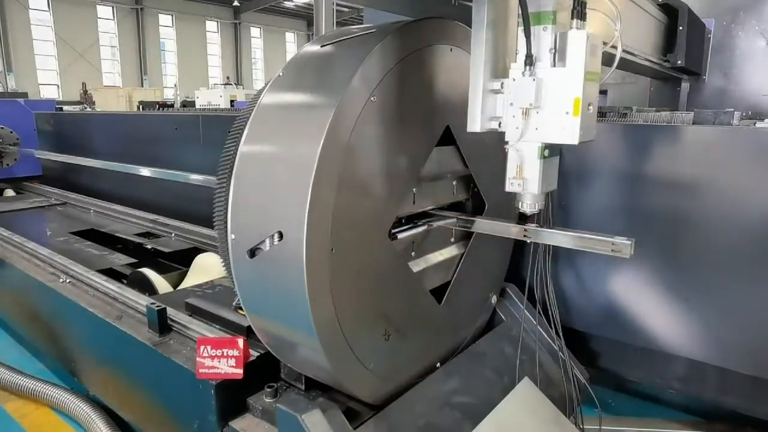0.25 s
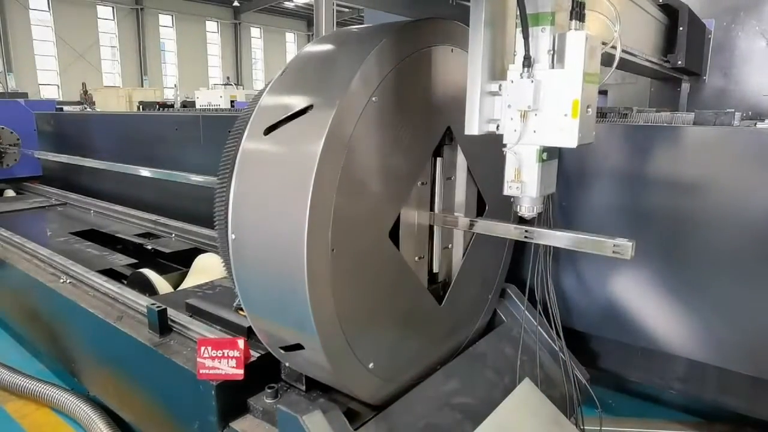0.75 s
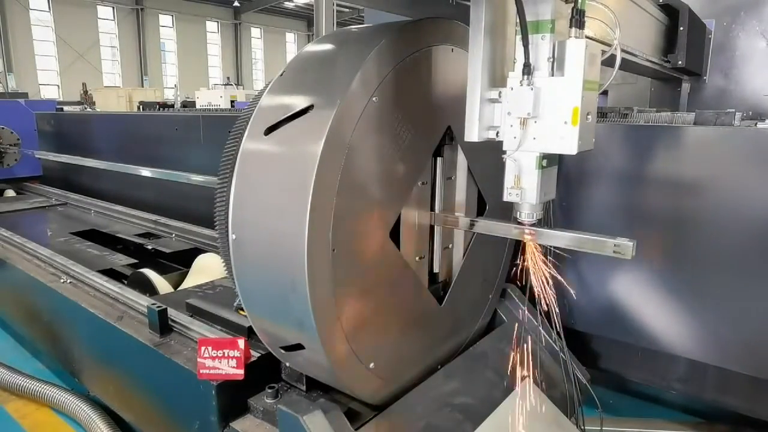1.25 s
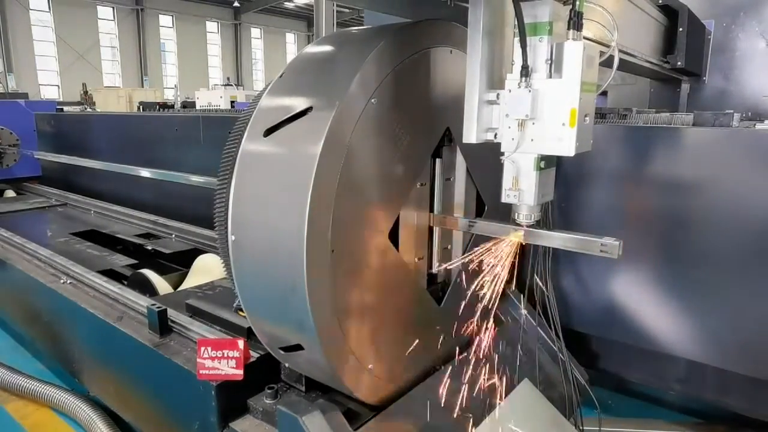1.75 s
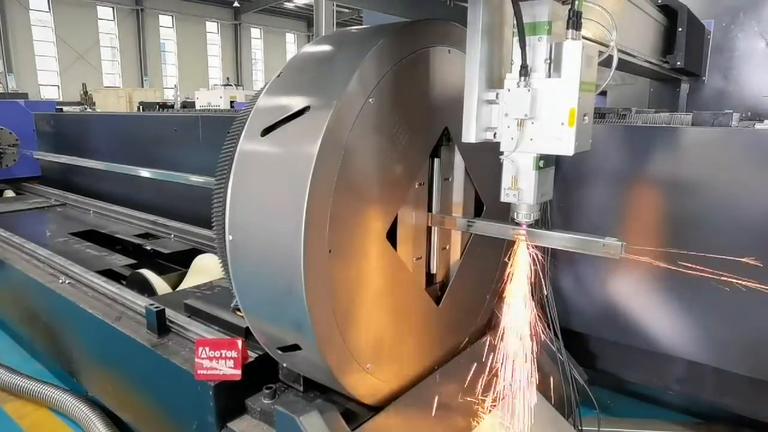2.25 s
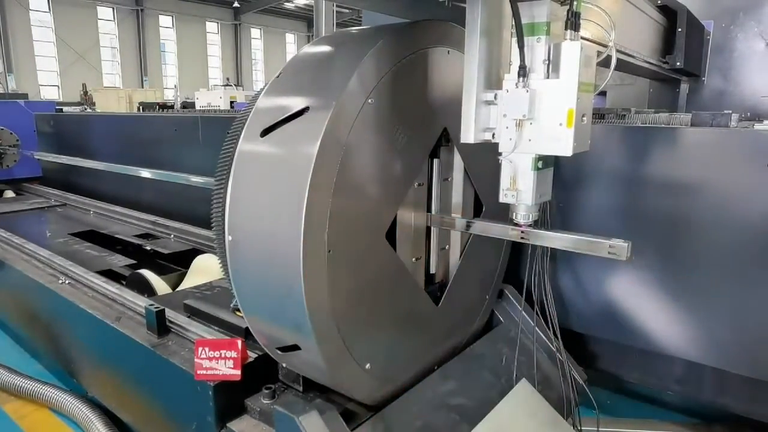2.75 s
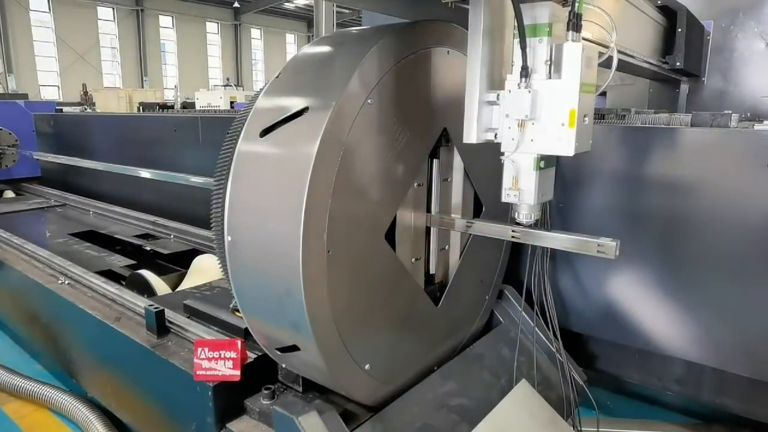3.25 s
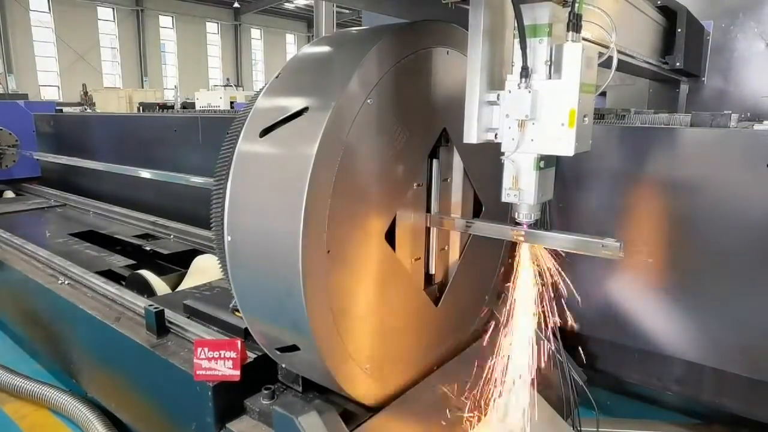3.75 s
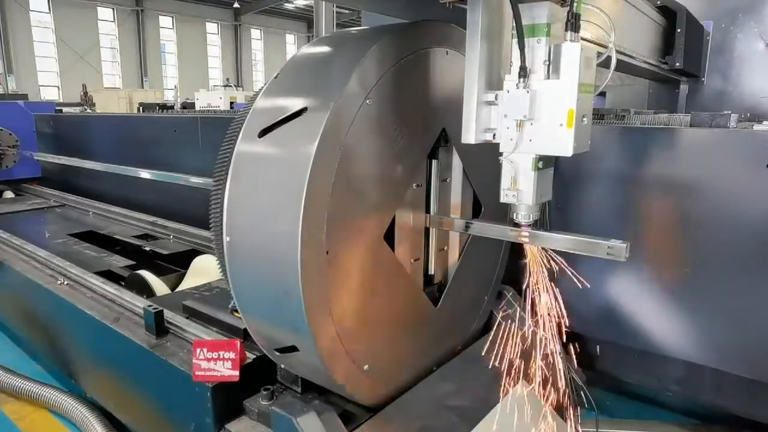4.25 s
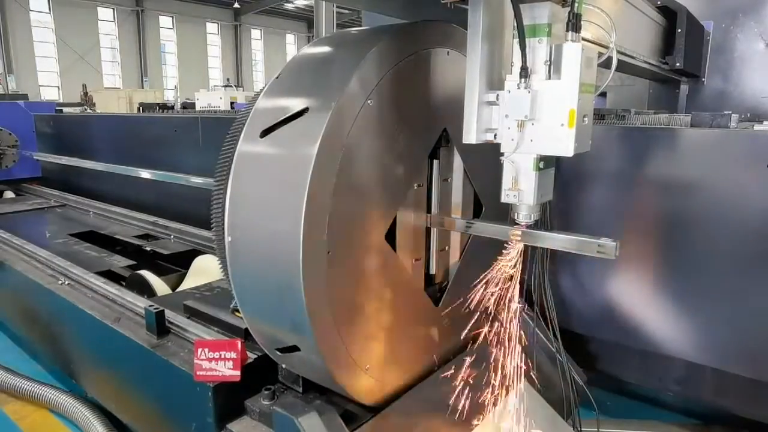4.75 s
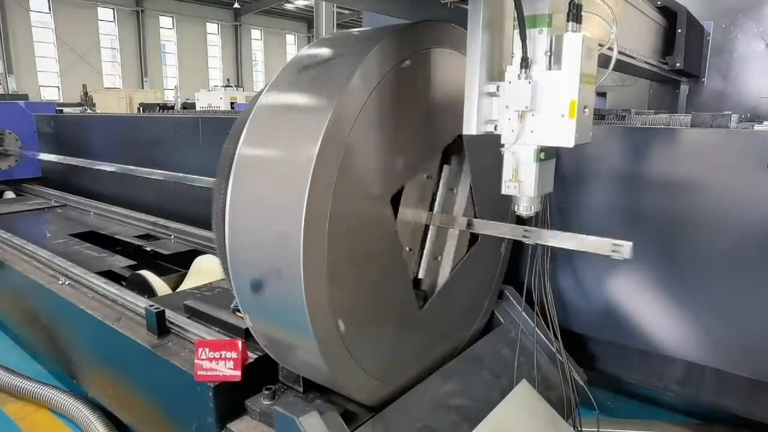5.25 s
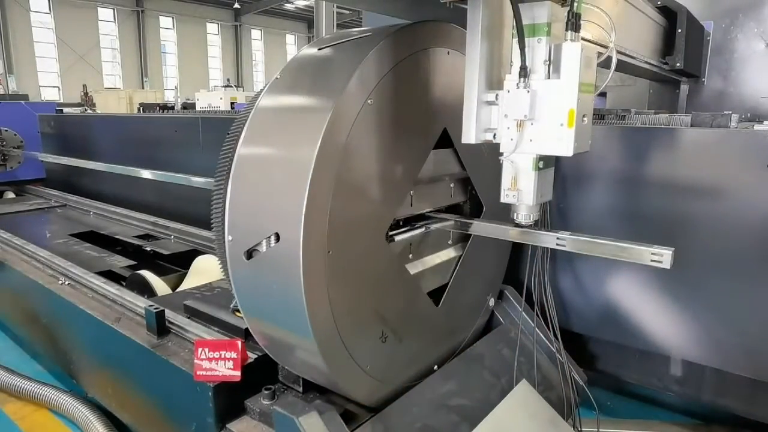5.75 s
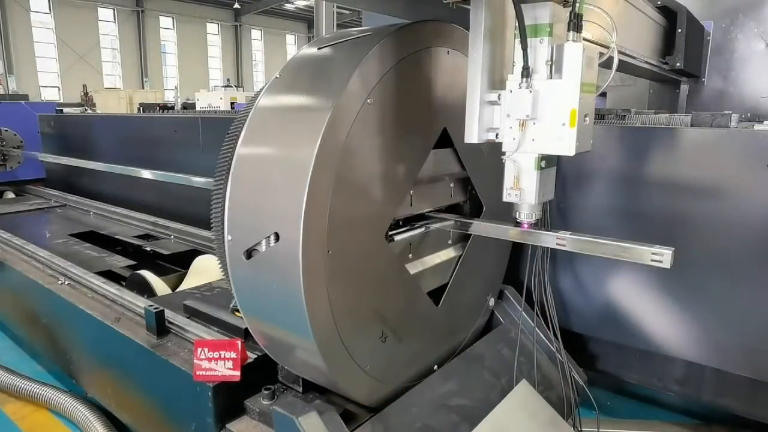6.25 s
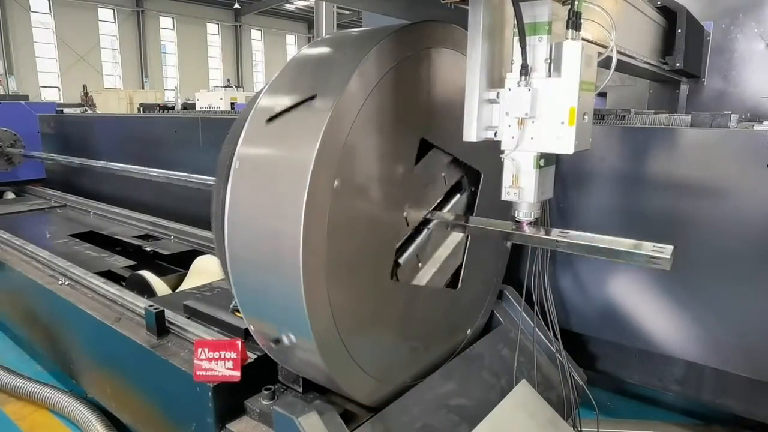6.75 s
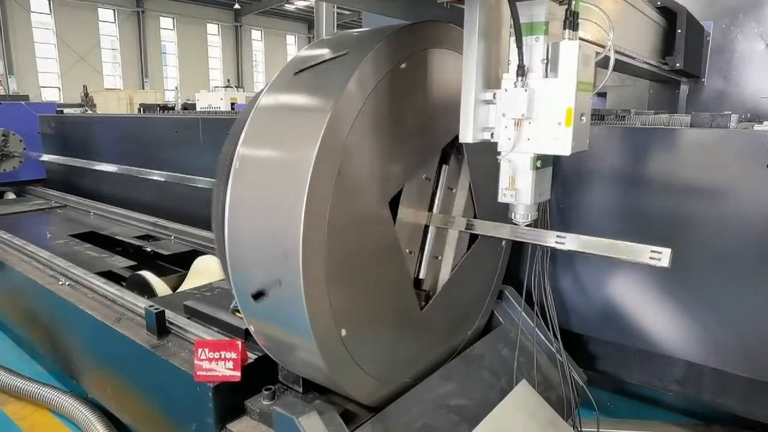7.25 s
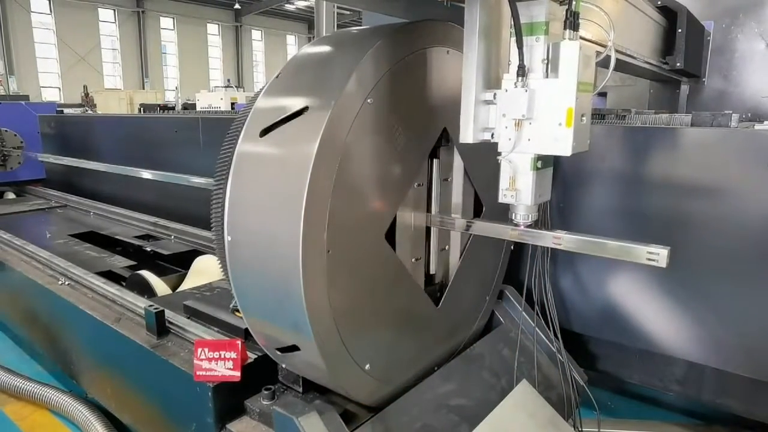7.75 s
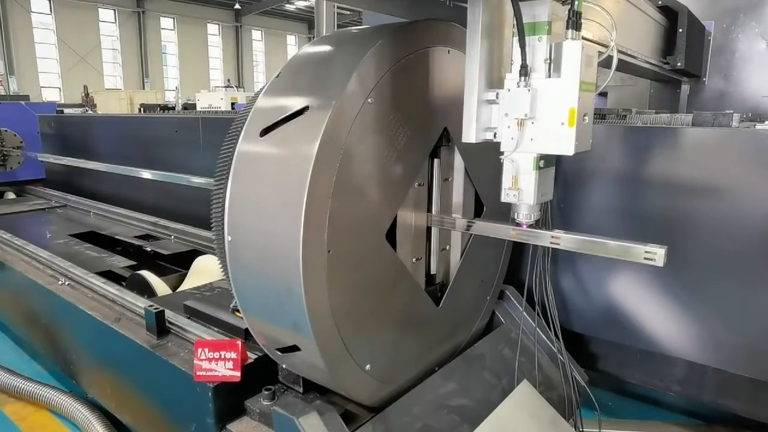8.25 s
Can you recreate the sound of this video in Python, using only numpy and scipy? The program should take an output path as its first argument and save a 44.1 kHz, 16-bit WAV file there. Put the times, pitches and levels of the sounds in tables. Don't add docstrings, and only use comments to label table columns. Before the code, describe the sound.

A harsh, continuous gas-jet hiss swells and dips as a laser cuts metal tube, with faint drive hums and dull valve thumps in a workshop.

```python
import sys
import numpy as np
from scipy import signal
from scipy.fft import rfft, irfft, next_fast_len
from scipy.io import wavfile
from scipy.ndimage import uniform_filter1d, map_coordinates

SR = 44100
rng = np.random.default_rng(int(sys.argv[2]) if len(sys.argv) > 2 else 0)


def nominal_scale(level):
    x = np.asarray(level, float) / 20
    return 10 ** x


def to_wav(sig):
    pcm = np.clip(np.atleast_2d(sig), -1, 1) * 32767
    pcm = np.round(pcm).astype(np.int16)
    wavfile.write(sys.argv[1], SR, pcm.T)


N = 374409
T_S = np.arange(N) / SR

# t/s, rise/s, hold/s, fall/s, level/dB
BLASTS = [
    (.12, 0.013, 0.46, 0.075, 7),
    (2.722, 0.018, 0.13, 0.27, 6.5),
    (4.997, 0.0037, 0.19, 0.052, 4.5),
    (7.446, .008, .26, .012, 0),
]
# t/s, rise/s, hold/s, fall/s, level/dB
CLEAR = [
    (5.79, 0.037, 0.42, .012, -4.5),
    (6.5, 0.084, 0.074, 0.14, -0.5),
    (7.0, 0.21, 0.23, .01, -2.5),
]
# t/s, length/s, f/Hz, level/dB, sag/(dB/s)
FIRST_TURNS = [
    (.365, 0.23, 132.7, -46, -14),
    (0.62, 0.18, 133.8, -49.5, -1),
    (0.79, 0.22, 132, -57.5, -7),
]
TURNS = [
    (5.245, 0.412, 133, -46, 0),
    (5.62, 0.17, 132.4, -52, -30),
    (5.886, 0.31, 134, -59, -3),
]
SLOW_TURNS = [
    (6.69, 0.47, 113.5, -59, 3),
    (7.26, 0.18, 113.2, -54, 2),
]


def unit(x):
    return x / np.sqrt(np.mean(x ** 2) + 1e-20)


def along(points, hz):
    f, v = np.transpose(points)
    return np.interp(np.log(hz + 1), np.log(f + 1), v)


def curve(rows):
    s, v = np.transpose(rows)
    return np.interp(T_S, s, v)


def surges(rows):
    total_db = 0
    for s, rise, hold, fall, db in rows:
        shape = np.minimum((T_S - s) / rise, 1 + (s + rise + hold - T_S) / fall)
        total_db = total_db + db * np.clip(shape, 0, 1)
    return total_db


def bumps(rows):
    return sum(db * np.exp(-.5 * ((T_S - s) / half) ** 2) for s, db, half in rows)


def wobble(rate):
    knots = rng.standard_normal(int(N * rate / SR) + 4)
    return map_coordinates(knots, [np.arange(N) * rate / SR])


def filtered(x, response):
    m = next_fast_len(N + 8192)
    return irfft(rfft(x, m) * response(np.fft.rfftfreq(m, 1 / SR)), m)[..., :N]


def turbulence(patchy_db):
    z = signal.stft(rng.standard_normal((2, N)), nperseg=256)[2]
    field = uniform_filter1d(rng.standard_normal(z.shape[1:]), size=4, axis=0)
    field = uniform_filter1d(field, size=14, axis=1)
    return signal.istft(z * nominal_scale(patchy_db * field / field.std()), nperseg=256)[1][:, :N]


def ports(pair, alike, paths):
    def mix(hz):
        echo = sum(weight * np.exp(-2j * np.pi * hz * lag) for lag, weight in paths)
        common = along(alike, hz) * echo
        common = common / np.maximum(np.abs(common), 1)
        return np.array([common, np.sqrt(np.abs(1 - np.abs(common) ** 2))])
    return np.array([pair[0], filtered(pair, mix).sum(0)])


def lulls():
    valve_gaps = [
        (0.783, 0.926, -19.5, 0.45),
        (3.075, 3.183, -5.5, 0.5),
        (5.669, 5.799, -15, 0.64),
        (6.095, 6.305, -7.5, 0.41),
    ]
    refill_s, total_db = 0.069, 0
    for shut, back, db, left in valve_gaps:
        bleed = np.clip((T_S - shut) / (back - shut), 0, 1)
        refill = left * np.exp(-np.abs(T_S - back) / refill_s)
        total_db = total_db + db * np.where(T_S < back, bleed, refill)
    return total_db


def pressure():
    # t/s, level/dB
    nozzle_flow = [(0, -21), (.8, -27.5), (1.12, -25.5), (1.32, -27), (1.87, -24.5), (2.3, -24.5),
                   (2.72, -23.5), (3.3, -20.5), (3.76, -19), (4.04, -21), (4.58, -19.5), (4.84, -21),
                   (5.5, -22), (6.6, -23), (6.88, -22), (7.25, -19.5), (7.55, -22), (8.49, -22.5)]
    # t/s, change/dB, half width/s
    head_drifts = [(1.117, 2, .006), (7.74, -1.5, .015), (3.45, -1, .08), (3.75, -1.5, 0.061),
                   (4.7, -0.5, .12), (6.85, -1, .1), (5.6, -0.5, .06), (.675, 1.5, 0.071),
                   (2.74, 1.5, 0.0095), (2.85, 0.5, .025), (2.95, 1.5, 0.013), (3.59, -5, 0.079),
                   (5.2, 3, 0.052), (5.3, 3, 0.046), (5.99, 2, .02), (.56, 3.5, 0.011), (5.55, 1.5, 0.048),
                   (6.5, 2.5, .03), (7.63, 1.5, 0.024)]
    return curve(nozzle_flow) + surges(BLASTS) + bumps(head_drifts) + lulls()


def into_tube():
    # t/s, level/dB
    tube_drive = [(0, -2), (.42, 1), (.62, -3), (.95, -1), (1.3, 3), (1.87, 2), (2.2, -2.5), (2.55, -2),
                  (2.85, 1), (3.07, -0.5), (3.4, -3.5), (3.6, 5), (3.78, -1), (4.04, 1.5), (4.84, -5),
                  (5.18, 1.5), (5.6, -6), (8.49, -3.5)]
    return curve(tube_drive) + surges(CLEAR)


def fed_out():
    return np.clip((T_S - 5.38) / 0.12, 0, 1)


def colour(hz):
    # f/Hz, left/(dB per Hz), right/(dB per Hz)
    port_levels = [(1500, -29.5, -27.0), (1900, -29.5, -27.0), (2150, -23.5, -19.5), (2400, -17.5, -11.0),
                   (2600, -18.5, -18.0), (3000, -20.5, -20.0), (3300, -17.5, -15.5), (3550, -19.5, -15.5),
                   (3800, -17.0, -16.0), (3930, -18, -18), (4050, -15.5, -16.5), (4200, -12, -17),
                   (4330, -15.5, -19.5), (4450, -15.5, -21.5), (4600, -14.0, -18.0), (4780, -15.5, -14.0),
                   (4950, -11.0, -14.5), (5120, -18.5, -12), (5400, -13.5, -11.0), (5700, -13.5, -8.0),
                   (6050, -14.0, -10.0), (6300, -10.0, -10.0), (6500, -10.5, -10.0), (6700, -12.5, -16.5),
                   (6900, -11.0, -13.0), (7150, -11.5, -10.0), (7550, -8.5, -9.0), (7800, -8.0, -12.0),
                   (8100, -2.5, -10.5), (8350, -0.5, -11.5), (8650, -3.0, -9.5), (9000, -6.0, -12.5),
                   (9350, -11.0, -14.5), (9800, -8.0, -15.0), (10200, -7.5, -18.0), (10500, -11.0, -22.0),
                   (10900, -12.0, -19.0), (11300, -16.0, -24.0), (11700, -18.0, -24.5),
                   (12500, -19.5, -22.5), (13500, -20.0, -26.0), (14400, -18.5, -28.5),
                   (15100, -16.5, -27.0), (15700, -16.5, -27.0)]
    # lag/s, left/dB, right/dB
    echo_faces = [
        (.0021, -24, -22),
        (.0034, -22, -20),
        (.0057, -23, -20),
        (.0093, -18, -18),
    ]
    echoes = 1
    for lag, left_db, right_db in echo_faces:
        delay_s = lag * np.array([[1], [1.13]])
        echoes = echoes + nominal_scale([[left_db], [right_db]]) * np.exp(-2j * np.pi * hz * delay_s)
    at_hz, *sides_db = np.transpose(port_levels)
    spectrum = nominal_scale([np.interp(hz, at_hz, side_db) for side_db in sides_db])
    return spectrum * echoes * np.minimum(hz / 1500, 1) ** 4


def ringing(rings):
    def response(hz):
        return nominal_scale(sum(np.array([[left_db], [right_db]]) * np.exp(-.5 * ((hz - at_hz) / w) ** 2)
                       for at_hz, w, left_db, right_db in rings))
    return response


def jet_gas():
    # f/Hz, strength
    common_strength = [(1500, 2.6), (2400, 1.42), (3500, 1), (6000, 1.74), (10000, 1.27), (15000, 1)]
    # right port lag/s, signed weight
    port_paths = [(-7e-05, -0.049), (-5e-06, -0.066), (7.5e-05, -0.118), (0.000155, 0.05),
                  (0.00031, -0.073), (0.00057, 0.103), (0.000785, -0.081), (0.0009, -0.052),
                  (0.00127, -0.038), (0.001425, 0.04), (0.0015, 0.044), (0.001545, 0.063),
                  (0.00171, -0.049), (0.002135, -0.068), (0.00218, -0.056), (0.00241, 0.047),
                  (0.00248, -0.065), (0.00256, 0.039)]
    # f/Hz, width/Hz, left/dB, right/dB
    blast_rings = [(3650, 250, 0, 3), (4950, 180, 4, 2), (5600, 250, -4, -1), (6300, 200, 2, 1),
                   (7550, 200, 3, 1), (8900, 250, -3, 1), (15200, 500, 1, 3)]
    # f/Hz, width/Hz, left/dB, right/dB
    fed_out_rings = [(2150, 100, 2, 2), (2380, 90, -3, -3), (2600, 200, -4.5, -3), (6550, 250, 2.5, 0),
                     (5350, 200, -1.5, -1), (4200, 80, -1, 0), (3050, 200, 1, 1), (3700, 400, -1.5, -1.5),
                     (4400, 250, 1, 1), (4950, 200, -3.5, -2.5), (7150, 150, 2, 1.5), (11000, 400, 1.5, .5),
                     (14800, 900, -1.5, -1.5)]
    gas = filtered(ports(turbulence(patchy_db=1.16), common_strength, port_paths), colour)
    full = np.clip(surges(BLASTS) / 6, 0, 1)
    gas = (1 - full) * gas + full * filtered(gas, ringing(blast_rings))
    out = fed_out()
    return (1 - out) * gas + out * filtered(gas, ringing(fed_out_rings))


def jet():
    split_hz = [2800, 4500, 7500, 9200, 11000]
    # t/s, rise/s, hold/s, fall/s, level/dB
    face_skims = [(2.94, .02, .06, .04, 3.5), (2.2, .03, .1, .05, -1.5), (2.25, .05, 0.39, .05, -1),
                  (1.92, .02, .04, .05, 1), (7.6, .1, .7, .1, 0), (1.897, 0.043, 0.23, .06, 7),
                  (1.6, 0.048, .01, 0.039, 3.5), (4.25, 0.33, .05, 0.17, 1.5), (7.4, 0.11, 0.15, .1, -2.5),
                  (0.71, 0.11, .02, 0.11, 8), (4.998, 0.0054, 0.0036, 0.011, 7),
                  (6.114, .006, .004, 0.011, 13), (2.3, 0.038, 0.076, .05, 3)]
    # t/s, level/dB
    kerf_depth = [(0, 3.5), (.25, 2.5), (.42, -1.5), (.93, -5), (1.32, 1), (1.9, 1.5), (2.2, -1.5),
                  (2.7, -0.5), (2.85, 5.5), (2.96, 1), (3.76, 4.5), (4.58, 0.5), (5.2, 1.5), (5.3, 0.5),
                  (6.0, 1), (6.88, 2.5), (7.2, -1), (8.49, 0)]
    # t/s, change/dB, half width/s
    passing_slots = [(.929, 4.5, .006), (2.848, 2, .008), (.415, -2, .006), (6.565, 0, 0.0072),
                     (2.735, 1.5, .005), (.05, 1.5, .012), (.11, -3, 0.0077), (6.122, -2, 0.004),
                     (6.68, -4.5, 0.012), (6.735, -5, 0.012), (6.79, -5, 0.01), (6.845, -6.5, 0.006),
                     (6.895, -4, 0.0079), (6.955, -1.5, .012), (7.085, -1.5, .012), (7.145, -4, 0.0081),
                     (7.195, -4, 0.016), (7.258, -6, 0.01), (7.328, -8.5, 0.0068), (7.398, -5, 0.015),
                     (7.475, 0.5, .006), (7.7, 0, 0.015)]
    # t/s, level/dB, half width/s
    boom_swells = [(.98, 4, .08), (2.85, 3, .05), (2.99, -3, .02), (3.26, 2, .03), (5.58, -5, .06),
                   (5.73, -6, .03), (5.82, 6, .03), (5.95, 0, .04), (2.45, 7.5, .15), (7.5, 2, .1),
                   (.15, -0.5, .1), (.45, 0.5, .1), (1.6, 0.5, .2), (4.2, -1.5, .06), (8.0, 1, .2)]
    # t/s, level/dB, half width/s
    roar_swells = [(.55, 2, .04), (2.77, 1.5, .05), (5.15, 2, .04), (5.05, -1.5, .03), (1.6, 0.5, 0.27),
                   (2.32, -5, 0.057), (7.2, 2.5, 0.041), (6.9, 2, .05), (0.24, 0.5, 0.076), (4.74, -2, .15),
                   (4.1, 1.5, .08), (4.75, 5.5, 0.062), (5.9, -2.5, .1), (7.25, -2, 0.04), (7.47, 0, .07),
                   (8.25, -2, .07), (5.5, 2, 0.053), (2.945, 2.5, 0.0086)]
    # t/s, level/dB, half width/s
    rim_swells = [(3.4, 4, 0.051), (6.7, 2.5, .03), (5.71, -9, .03), (3.25, 2, .02), (0.89, 2, .03),
                  (.55, 2, .05), (2.76, 3, 0.037), (2.5, -1, .06), (3.7, -1, .1), (5.1, -5, .05),
                  (6.25, 2, .05), (6.9, -4, .12), (3.35, 0.5, 0.093), (.2, 0.5, .05)]
    # t/s, level/dB, half width/s
    kerf_swells = [(.555, 2, .03), (.9, -2, .02), (5.72, 2, .025), (5.95, -1, .05), (.845, 9, .025),
                   (1.03, -4, .025), (2.87, -2, .03), (3.07, 1.5, .02), (.05, -0.5, .05), (.2, -0.5, .08),
                   (3.4, -2, 0.078), (3.62, -2.5, 0.037), (2.92, 0, .06), (6.85, -0.5, 0.091),
                   (7.5, 0, .04)]
    # t/s, rise/s, hold/s, fall/s, level/dB
    hole_puff = [
        (7.56, 0.14, .025, .008, 4.5),
    ]
    # t/s, level/dB, half width/s
    sizzle_swells = [(5.77, 3, .04), (6.06, 2, .04), (5.0, -2, .02), (2.74, -2, .03), (5.57, 4, .035),
                     (2.93, -1, .03), (3.07, 2, .03), (0.81, 6, .05), (6.27, 6, .06), (1.95, 3, .04),
                     (1.7, 1, .2), (.14, 2, .015), (0.44, 3, .1), (1.3, 2, .2), (2.7, 5, 0.061),
                     (5.5, 3.5, 0.18), (6.76, 5, 0.19), (7.5, -3, 0.15), (5.6, -2, 0.037)]

    flow_db, skim_db, tube_db = pressure(), surges(face_skims), into_tube()
    kerf_db = curve(kerf_depth)
    pan_db = 0.08 + 0.076 * (flow_db + skim_db - flow_db.mean()) + 0.05 * tube_db
    flutter_db = 0.15 * wobble(8.2) + 0.24 * wobble(30) + 0.45 * wobble(250)

    gas = jet_gas()
    below = [filtered(gas, lambda hz: 1 / (1 + (hz / edge) ** 12)) for edge in split_hz]
    boom, roar, kerf, nozzle, rim, sizzle = np.diff([0 * gas, *below, gas], axis=0)

    roar = (roar + nominal_scale(bumps(boom_swells)) * boom) / np.std(roar + boom)
    roar_db = -11 + tube_db + bumps(roar_swells) + 3 * fed_out()
    rim_db = 0.4 * skim_db + bumps(rim_swells)
    hiss = (nominal_scale(skim_db) * nozzle + nominal_scale(rim_db) * rim) / np.std(nozzle + rim)
    cut_db = -4 + kerf_db + bumps(kerf_swells) + surges(hole_puff) + 0.29 * surges(CLEAR[:1])
    sizzle_db = -5.5 - 0.54 * kerf_db + bumps(sizzle_swells) + 0.16 * lulls()
    body = nominal_scale(roar_db) * roar + nominal_scale(cut_db) * unit(kerf) + hiss + nominal_scale(sizzle_db) * unit(sizzle)
    level_db = flow_db - 2.04 + bumps(passing_slots) + flutter_db
    return nominal_scale(level_db) * nominal_scale([pan_db / 2, -pan_db / 2]) * body


def column(modes, alike, lag):
    def ring(f):
        return sum((-1) ** k * nominal_scale([[left_db], [right_db]]) * 1j * f * w / (hz * hz - f * f + 1j * f * w)
                   for k, (hz, w, left_db, right_db) in enumerate(modes))
    return filtered(ports(turbulence(patchy_db=1.5), [(1000, alike)], [(lag, 1)]), ring)


def pipe():
    # f/Hz, width/Hz, left/dB, right/dB
    low_modes = [(1189, 28, 3.5, 5), (1086, 11, -4, -4)]
    # f/Hz, width/Hz, left/dB, right/dB
    upper_modes = [(2151, 175, -1.5, 6.5), (2535, 180, 0, 5), (3500, 73, -3, 6.5), (3580, 120, -37, -13),
                   (4570, 61, 8.5, -11), (4960, 85, 3.5, 1), (5660, 200, -15, 8), (6640, 91, 5.5, 4),
                   (7680, 96, -18, 3.5), (8300, 103, 12.5, -14), (10800, 130, 6, -6)]
    # f/Hz, width/Hz, left/dB, right/dB
    hole_modes = [(2610, 28, 9, 10), (5800, 110, 0, 12), (1007, 41, -7, -7)]
    # t/s, level/dB, half width/s
    mode_locks = [(5.27, -3, .05), (4.92, 3, .06), (2.8, 3, .05), (3.03, -4, .06), (7.85, 10, .15),
                  (1.5, 3.5, 0.1), (2.55, 8.5, 0.14), (3.6, 6, 0.053), (6.03, 27.5, 0.37), (8.5, 6, 0.044),
                  (8.28, 21.5, 0.16)]
    # t/s, level/dB, half width/s
    hole_openings = [(1.98, -3, 0.046), (0.56, 3.5, 0.13), (1, 4, 0.22), (2.8, -0.5, 0.089),
                     (5.3, -7, 0.05), (1.67, 2, 0.096), (2.13, 4.5, 0.068), (2.49, 6, 0.16),
                     (3.85, 3.5, 0.1), (8.4, 18, 0.18)]
    # t/s, level/dB
    hole_whistle = [(7.42, -52), (7.45, -49), (7.5, -46), (7.54, -48), (7.56, -55), (7.605, -46),
                    (7.66, -46), (7.7, -43), (7.716, -43), (7.724, -78)]
    flow_db, tube_db, out = pressure(), into_tube(), fed_out()
    flow_db = flow_db - flow_db.mean()
    low_db = -50 + 0.57 * flow_db + 0.75 * tube_db - 23 * out + bumps(mode_locks)
    upper_db = -32.5 + 0.47 * flow_db + 1.15 * tube_db - 19.5 * out + bumps(hole_openings)
    low = nominal_scale(low_db + 0.89 * wobble(16)) * unit(column(low_modes, alike=0.8, lag=.00007))
    upper = nominal_scale(upper_db + 0.53 * wobble(9.2)) * unit(column(upper_modes, alike=0.77, lag=0.00015))
    hole = nominal_scale(curve(hole_whistle) + 15.0) * unit(column(hole_modes, alike=0.63, lag=0.00011))
    return low + upper + hole * (np.arange(N) > hole_whistle[0][0] * SR)


def shop():
    # t/s, level/dB
    hall_level = [(0, -47), (1.0, -50.5), (3.05, -49), (3.6, -53), (4.6, -51.5), (5.2, -50.5), (5.4, -50),
                  (5.75, -53), (5.95, -51.5), (6.9, -54.5), (7.6, -51.5), (8.49, -53.5)]
    # f/Hz, level/(dB per Hz)
    hall_colour = [(24, -63), (40, -18), (84, -16), (177, -7.5), (261, -6), (296, -7.5), (348, -5.5),
                   (566, -7), (709, -10.5), (1030, -8), (1190, -8), (1440, -10.5), (1900, -12.5),
                   (2470, -10), (4300, -19), (6500, -120)]
    # f/Hz, left-right likeness
    hall_alike = [(30, 0.91), (130, 0.98), (300, 0.89), (650, 0.84), (1400, 0.23)]
    air = ports(turbulence(patchy_db=1.47), hall_alike, [(.00003, 0.96)])
    air = filtered(air, lambda hz: nominal_scale(along(hall_colour, hz)) * nominal_scale([[-1.2], [1.2]]))
    turns = TURNS + FIRST_TURNS + SLOW_TURNS
    turning_db = surges([(s, .05, length - .05, .08, 1) for s, length, *_ in turns])
    return nominal_scale(curve(hall_level) + 3.5 + turning_db + 0.54 * wobble(6)) * unit(air)


def bed():
    # t/s, level/dB
    bed_level = [(0, -66), (.35, -67), (1.0, -59), (1.3, -78), (5.15, -69.5), (5.35, -60), (5.85, -58),
                 (6.05, -61), (6.5, -59), (7.1, -58), (7.5, -57), (8.49, -62)]
    # f/Hz, level/(dB per Hz)
    bed_colour = [(30, -30), (60, -10), (110, -0.5), (170, 2), (260, -6.5), (420, -20), (900, -60)]
    shake = filtered(rng.standard_normal(N), lambda hz: nominal_scale(along(bed_colour, hz)))
    return nominal_scale(curve(bed_level) + 1.5 * wobble(8)) * unit(shake)


def motor(moves, orders, rough_db):
    out = np.zeros(N)
    for s, length, hz, db, sag_db in moves:
        on = np.clip(np.minimum(T_S - s, s + length - T_S) / 0.049, 0, 1)
        turn = 2 * np.pi * hz * T_S
        level_db = db + sag_db * np.clip(T_S - s, 0, length)
        hum = 0
        for k, order_db in orders:
            strength = nominal_scale(order_db + rough_db * wobble(14))
            hum = hum + strength * np.sin(k * turn + 0.28 * k * wobble(10))
        out += on * nominal_scale(level_db) * hum
    return out


def drives():
    first_orders = [(1, 2), (2, -8), (2.62, -9), (3, -9), (4, -4.5), (5, -11)]
    turn_orders = [(1, 2), (1.5, -14), (1.9, -9), (3, -2), (4, -8), (4.4, -12), (5, -10), (5.5, -14),
                   (6, -6.5)]
    slow_orders = [(1, 4.5), (1.6, -6), (2, -3), (3.56, -6), (4.56, -6)]
    # t/s, length/s, f/Hz, level/dB, sag/(dB/s)
    feed_moves = [
        (7.72, .6, 263.5, -61, -1),
        (8.0, .45, 188.5, -61, 3),
    ]
    chuck = motor(FIRST_TURNS, first_orders, rough_db=1.5) + motor(TURNS, turn_orders, rough_db=2.2)
    slow_chuck = motor(SLOW_TURNS, slow_orders, rough_db=1.5)
    return chuck + slow_chuck + motor(feed_moves, [(1, 0)], rough_db=1.5)


def thumps():
    # t/s, peak/dB, f/Hz, t60/s
    knocks = [(0.387, -36, 149, 0.06), (0.927, -39, 225, 0.13), (2.726, -36.5, 350, 0.1),
              (3.188, -37, 190, 0.057), (3.19, -36, 320, 0.078), (0.94, -40, 310, .1), (5.8, -43, 440, .08),
              (6.5, -46, 360, .1), (0.7, -41, 350, 0.22), (6.89, -46, 182, .15), (4.47, -42, 270, 0.19),
              (1.2, -45, 172, .2), (5.272, -39, 150, 0.06), (5.615, -35, 400, 0.11),
              (5.776, -39, 220, 0.051), (5.802, -35, 206, 0.1), (7.691, -35, 190, 0.04)]
    out, t = np.zeros(N + SR), np.arange(SR // 4) / SR
    puffs = rng.standard_normal((len(knocks), len(t)))
    for (s, db, hz, t60), puff in zip(knocks, puffs):
        dull = uniform_filter1d(puff, size=30) - uniform_filter1d(puff, size=260)
        phase = 2 * np.pi * hz * t
        knock = np.sin(phase) + 0.48 * np.sin(1.61 * phase) + 3.0 * dull
        decay = nominal_scale(db - 2.0 - 60 * t / max(t60, .01))
        out[round(s * SR):][:len(t)] += decay * (1 - np.exp(-t / 0.0013)) * knock
    return out[:N]


def scene():
    frame = bed() + drives() + thumps()
    return jet() + pipe() + shop() + frame * nominal_scale([[-1.6], [1.6]])


def roll_off(x):
    return signal.sosfilt(signal.butter(12, 16050, fs=SR, output="sos"), x)


def record(dry):
    held = dry / (1 + np.abs(dry / 1.02) ** 4) ** .25
    limited = filtered(held, lambda hz: (hz < 15760) / np.sqrt(1 + (70 / (hz + 1)) ** 4))
    return roll_off(limited)


dry = scene()
out = record(dry)
to_wav(out)
```